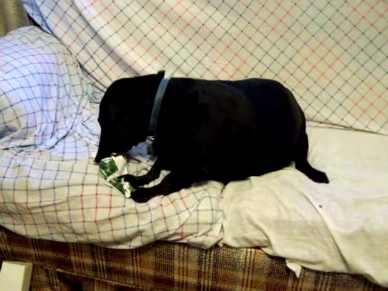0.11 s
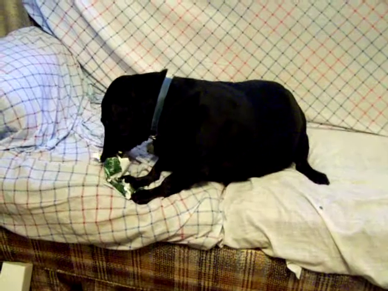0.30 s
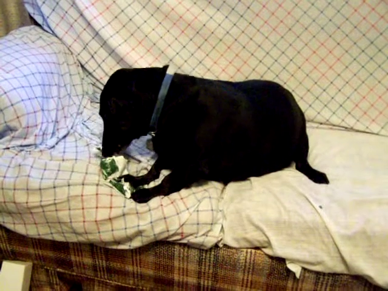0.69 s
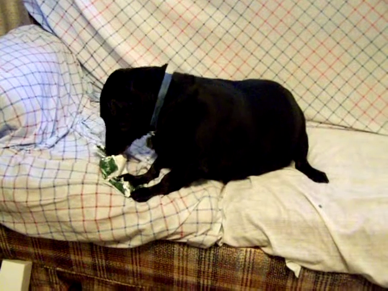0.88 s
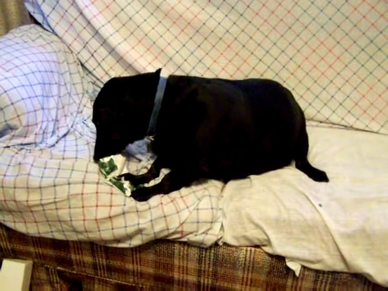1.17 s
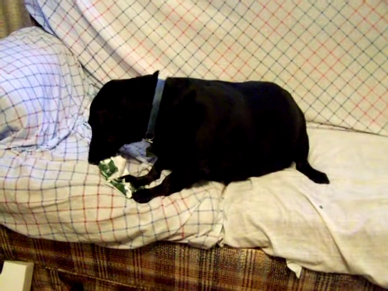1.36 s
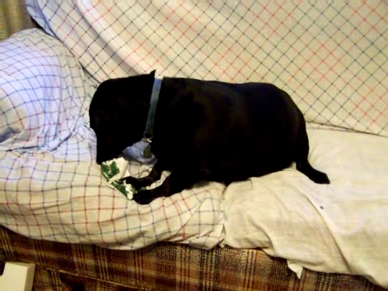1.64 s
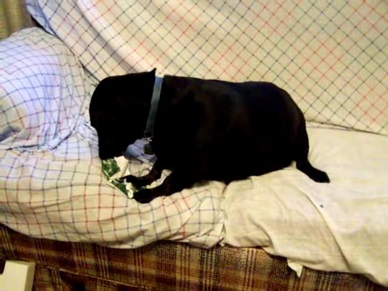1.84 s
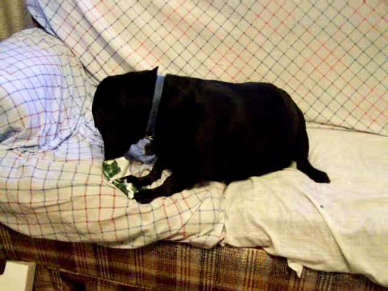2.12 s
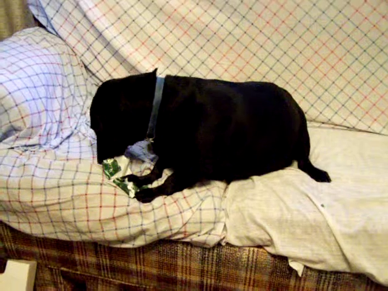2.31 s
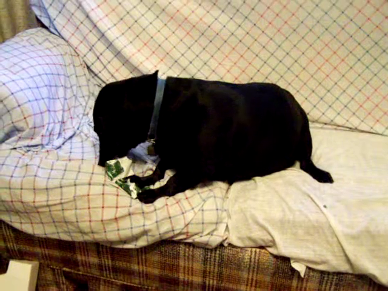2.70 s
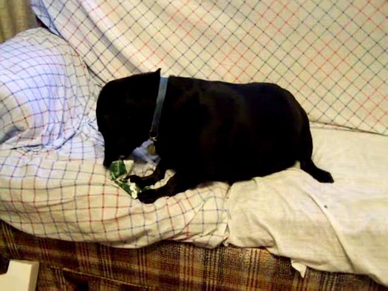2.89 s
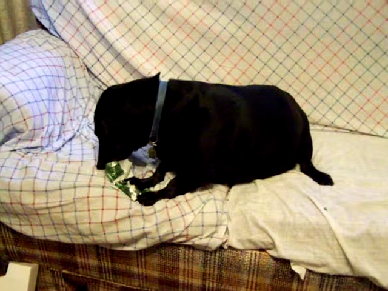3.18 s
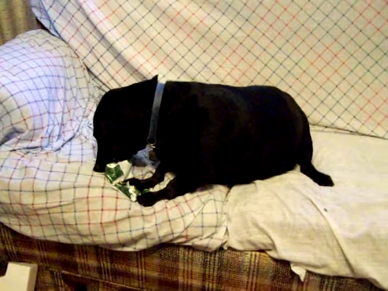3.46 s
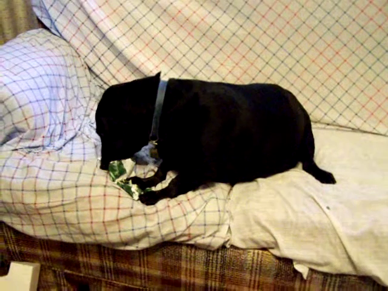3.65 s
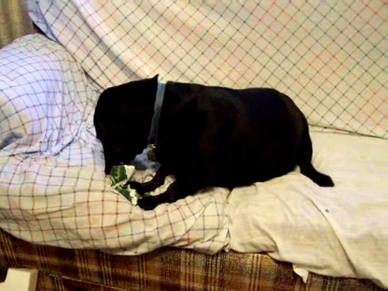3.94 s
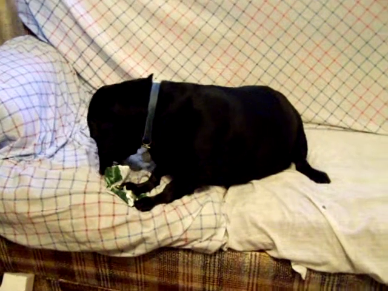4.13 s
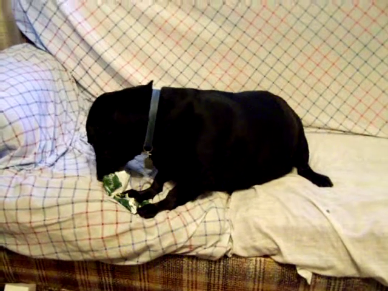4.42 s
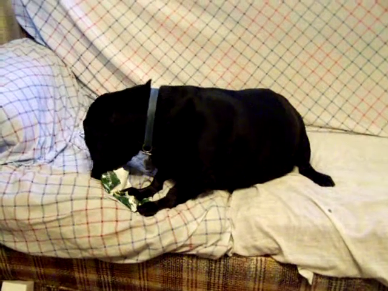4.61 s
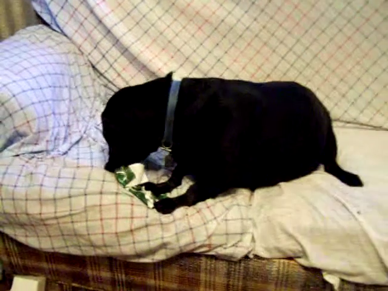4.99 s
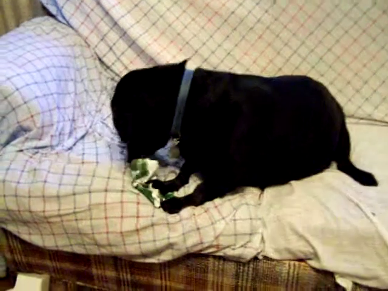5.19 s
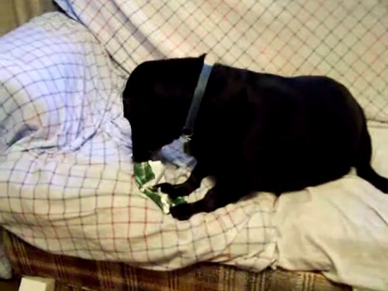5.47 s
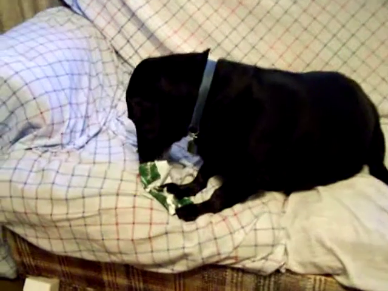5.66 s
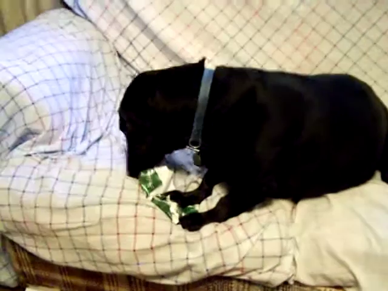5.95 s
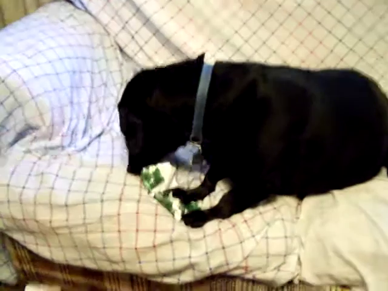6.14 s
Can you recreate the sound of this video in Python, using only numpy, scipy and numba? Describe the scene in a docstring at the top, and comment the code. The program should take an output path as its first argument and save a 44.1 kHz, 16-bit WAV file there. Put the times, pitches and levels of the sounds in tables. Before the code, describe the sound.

A dog chews and pulls at wrapping paper on a couch in a small, soft room, heard from a couple of metres. From 0 to 0.7 s, a lively burst of bright, sharp creases snaps amid fine crackles, with a short flap scrape around 0.64 s. It then drops to faint rustle; sparse, softer snaps come from 1.3 to 2.1 s, with faint rips at about 2.2 and 2.7 s. From 2.9 s the crinkling turns dense and crisp, in uneven clusters. After 4.4 s soft dull cushion thuds join in, and the strongest tearing and crackling comes around 5.1 to 5.4 s with a rasping scrape. It thins, then snaps and scrapes again near 5.9 s, easing off by 6.3 s. Short room echoes surround the paper; steady camera hiss, thin high motor tones and a faint low hum continue throughout.

```python
"""A dog on a couch chews and pulls at wrapping paper, a couple of metres from a small camera.
It opens with a burst of creases snapping over, each a few short ringing clicks, among swarms of fine crackles,
and one flap scrapes as noise in a resonance. Sparser, softer snaps and two faint rips follow; from 2.9 s on
the chewing turns dense, and after 4.4 s cushions thud as dull noise and more flaps scrape before it thins out.
A small soft room echoes the paper, over the camera's shaped hiss, thin motor tones and a faint hum throughout."""
import sys
import numpy as np
from scipy import signal
from scipy.fft import rfft, irfft
from scipy.io import wavfile
from scipy.ndimage import uniform_filter1d
from numba import njit

SR = 44100
rng = np.random.default_rng(int(sys.argv[2]) if len(sys.argv) > 2 else 0)


def ratio(d):
    """dB to gain"""
    e = np.asarray(d, float) / 20
    return 10 ** e


def bounce(signal):
    """Save signal as a 16-bit WAV file at the path given by the first command-line argument."""
    frames = np.transpose(np.atleast_2d(signal))
    limited = np.clip(frames, -1, 1)
    pcm = np.round(limited * 32767).astype(np.int16)
    wavfile.write(sys.argv[1], SR, pcm)


N = 278271  # samples, 6.31 s
SETTLE_S = 0.0088  # decay time of each swarm or scrape once its length is over


def colour(x, points):
    """Shape the spectrum by (Hz, dB) points, joined by straight lines over log frequency."""
    hz, db = np.transpose(points)
    axis = np.arange(len(x) // 2 + 1) * SR / len(x) + 1
    gain = ratio(np.interp(np.log(axis), np.log(hz), db))
    return irfft(rfft(x) * gain, len(x))


def level(x, db):
    """Set the rms level."""
    return x * ratio(db) / np.sqrt(np.mean(x ** 2))


def band(x, hz, width):
    """Two-pole resonance, width in Hz."""
    return signal.lfilter(*signal.iirpeak(hz, hz / width, fs=SR), x)


def walk(rate):
    """Random levels held 1 / rate s and slewed twice; spread near 1."""
    hold = int(SR / rate)
    steps = np.repeat(rng.standard_normal(N // hold + 1), hold)
    smooth = uniform_filter1d(uniform_filter1d(steps, hold), hold)
    return 1.456 * smooth[:N]


@njit
def grains(n, start, step, cycles, size, phase):
    """Short wave packets that swell for a moment and die; step is cycles per sample."""
    out = np.zeros(n)
    for g in range(len(start)):
        span = cycles[g] / step[g]  # samples until the packet is loudest
        for i in range(min(int(8 * span), n - start[g])):
            swell = i / span * np.exp(1 - i / span)
            out[start[g] + i] += size[g] * swell * np.sin(2 * np.pi * step[g] * i + phase[g])
    return out


def play(s, hz, cycles, db):
    """Grains at given times, pitches, swell lengths in cycles and envelope peak levels."""
    s, hz, cycles, db = np.broadcast_arrays(s, hz, cycles, db)
    start = np.clip(s * SR, 0, N - 1).astype(np.int64)
    return grains(N, start, hz / SR, 1. * cycles, ratio(db), rng.random(len(s)))


# Spectrum of the camera's hiss. Each row: frequency in Hz, relative density in dB per Hz.
HISS_SPECTRUM = [(15, -34), (25, -0.5), (174, -1), (390, -2.5), (1920, -12.5), (4010, -5.5), (5130, -12.5),
                 (6400, -8), (8180, -17), (8800, -47), (11400, -69.5), (19400, -120)]
# Narrow bands standing out of the hiss. Each row: centre in Hz, width in Hz, rms in dB before it wavers.
HISS_BANDS = [(4090, 590, -58), (6305, 560, -64)]
# Thin motor tones in the treble. Each row: centre frequency in Hz, rms in dB before it flickers.
MOTOR_TONES = [(3930, -65), (4037, -67.5), (4124, -66), (4323, -70), (6051, -70), (6142, -68.5),
               (6288, -66.5), (6352, -70), (6481, -70)]
# Harmonics of the motor hum. Each row: multiple of the base pitch, peak level in dB before it wavers.
HUM_LINES = [(1, -69.5), (2, -70.5), (3, -64), (4, -71), (6, -62), (8, -63)]


def camera():
    """Steady shaped noise with narrow resonant bands, thin drifting sines and wavering hum harmonics."""
    out = level(colour(rng.standard_normal(N), HISS_SPECTRUM), -52)
    for hz, width, db in HISS_BANDS:
        narrow = band(band(rng.standard_normal(N), hz, width), hz, width)
        out += level(narrow, db) * ratio(walk(6.2))
    for hz, db in MOTOR_TONES:
        flicker_db = 2 * walk(4.9)
        phase = 2 * np.pi * np.cumsum(hz + 3.0 * walk(9)) / SR
        out += np.sqrt(2) * ratio(db + flicker_db) * np.sin(phase)
    hum_hz = 29.2 * (1 + .004 * walk(2.065))
    turn = 2 * np.pi * np.cumsum(hum_hz) / SR
    for multiple, db in HUM_LINES:
        out += ratio(db + 1.5 * walk(8.5)) * np.sin(multiple * turn + 2 * np.pi * rng.random())
    return out


def room(x):
    """Close echoes from couch and walls, then a short tail that dulls as its brighter part fades first."""
    t60_s, echo_db, gap_s = 0.32, -8, 0.0016
    wall_s, wall_db = 0.011, 2.5  # the first hard wall answers this late; the dull tail is stronger from then on
    t = np.arange(SR // 3) / SR
    patches = ratio(1.5 * rng.standard_normal(len(t) // 40 + 1)).repeat(40)[:len(t)]
    noise = rng.standard_normal(len(t)) * patches
    dull = band(noise, 2600, 4800) * np.exp(-np.log(1000) * t / t60_s)
    bright = 2.7 * noise * np.exp(-np.log(1000) * t / (0.15 * t60_s))
    tail = (dull * ratio(wall_db * (t > wall_s)) + bright) * (t > gap_s)
    echo = signal.fftconvolve(x, tail / np.sqrt(np.sum(tail ** 2)))[:N]
    return x + ratio(echo_db) * echo


# Weight shifting on the cushions. Each row: start in seconds, noise rms in dB before the push shapes it,
# centre in Hz.
CUSHION_THUDS = [(4.461, -41.5, 431), (5.041, -39, 332), (5.123, -45, 223), (5.359, -35.5, 584),
                 (5.893, -42.5, 510), (6.096, -44, 191)]


def thuds():
    """Soft cushions: dull resonant noise with a fast onset and a 55 ms exponential decay."""
    out, t = np.zeros(N), np.arange(N) / SR
    for s, db, hz in CUSHION_THUDS:
        age = np.maximum(t - s, 0)
        push = np.minimum(age / 0.0015, 1) * np.exp(-age / 0.055)
        dull = level(band(rng.standard_normal(N), hz, 0.76 * hz), 0)
        out += ratio(db) * push * dull
    return out


# Paper sliding over paper, a dense coloured rasp. Each row: start in seconds, length in seconds before
# it settles, rms in dB before the push shapes it, centre in Hz.
FLAP_SCRAPES = [(0.636, 0.057, -46.5, 1680), (5.116, 0.038, -38, 2350), (5.944, 0.06, -41, 2270),
                (6.202, 0.05, -51, 2400)]


def scrapes():
    """Rough noise in one resonance while a flap slides."""
    out, t = np.zeros(N), np.arange(N) / SR
    for s, length, db, hz in FLAP_SCRAPES:
        fade = np.exp(-np.maximum(t - s - length, 0) / SETTLE_S)
        push = np.clip((t - s) / 0.005, 0, 1) * fade
        rough = rng.standard_normal(N) * ratio(4.7 * walk(400))
        rasp = band(band(rough, hz, 0.21 * hz), hz, 0.21 * hz)
        out += push * level(rasp, db)
    return out


# Parts of one crease's click. Each row: centre pitch in Hz, pitch scatter in dB of frequency ratio, usual
# cycles until loudest, usual level in dB relative to the crease, dB gained per octave of ring pitch.
CLICK_PARTS = [(1145, 2.5, 0.59, -22.5, -2.5), (2166, 3, 0.76, -14.5, 1.5), (3773, 0.91, 1.25, -7, 0),
               (5114, 1.61, 1.76, -14.5, 3), (6290, 1.58, 4, -18, 0.5)]


def creases(s, db, ring_hz):
    """Each crease flips with one wide click, and the flat facet beside it rings for a few cycles."""
    octaves = np.log2(ring_hz / 3500)  # small facets ring high and click brightly
    out = play(s, ring_hz, 1.39 * 2 ** (0.19 * octaves), db - 7.5 + 2.84 * octaves)
    for hz, scatter_db, cycles, share_db, lean_db in CLICK_PARTS:
        chance = rng.standard_normal((len(s), 4)).T
        pitch = np.clip(hz * ratio(scatter_db * chance[0]), 750, 9000)
        swell = cycles * ratio(2.4 * chance[1])
        part_db = db + share_db + lean_db * octaves + 1.9 * chance[2]
        # each part starts a fraction of a millisecond late, at random, which softens the click
        late = .00025 * np.abs(chance[3])
        out = out + play(s + late, pitch, swell, part_db)
    return out


# Rips and crumples, swarms of fine crackles. Each row: start in seconds, length in seconds before it
# settles, swarm level in dB that sets the crackle sizes.
RIP_SWARMS = [(0.004, 0.075, -43), (0.129, 0.075, -39.5), (0.26, 0.058, -31.5), (0.328, 0.025, -36.5),
              (0.406, 0.073, -33), (0.597, 0.017, -37), (0.64, 0.045, -38), (2.202, 0.16, -53.5),
              (2.698, 0.32, -47), (2.87, 0.015, -30.5), (3.302, 0.014, -31), (3.436, 0.04, -40.5),
              (3.483, 0.1, -34.5), (3.826, 0.025, -37), (4.001, 0.088, -41.5), (4.167, 0.073, -36),
              (4.263, 0.027, -35), (4.375, 0.019, -29.5), (4.533, 0.013, -40.5), (4.619, 0.0146, -36),
              (4.892, 0.028, -33), (4.938, 0.03, -40.5), (5.081, 0.059, -42), (5.177, 0.15, -44),
              (5.255, 0.044, -28), (5.363, 0.057, -25.5), (5.488, 0.039, -36), (5.93, 0.18, -42.5),
              (6.195, 0.12, -46.5)]


def crackle():
    """Fine random clicks swell while a rip runs and in a scatter answering each snap; a few are much bigger."""
    count = int(600 * N / SR)  # 600 crackles per second
    when, big = rng.random(count) * N / SR, rng.exponential(size=count)
    rustle_db = -56 + 4.0 * walk(30)  # faint rustle throughout
    power = ratio(rustle_db[(when * SR).astype(int)]) ** 2
    # a brief crackly scatter answers each snap about 5 ms later, like a rough wall echo
    answer_gap_s, answer_s, answer_db = 0.0049, 0.0066, -25
    answers = [(s + answer_gap_s, answer_s, db + answer_db) for s, db, _ in CREASE_SNAPS]
    for s, length, db in RIP_SWARMS + answers:
        after = np.maximum(when - s - length, 0)
        rise = np.clip((when - s) / 0.0032, 0, 1)
        power = power + rise * (ratio(db) * np.exp(-after / SETTLE_S)) ** 2
    size_db = 10 * np.log10(power) + 2.63 * big + 7  # a crackle peaks well above its swarm's level
    ring_hz = 3300 * ratio(3.1 * rng.standard_normal(count))
    return creases(when, size_db, np.clip(ring_hz, 1000, 8000))


# Big creases snapping over. Each row: start in seconds, strength in dB that the ring and click parts
# are set against, ring pitch in Hz.
CREASE_SNAPS = [(0.0592, -22, 6200), (0.0841, -10.5, 7040), (0.168, -11, 5800), (0.2616, -14, 4400),
                (0.2707, -5.5, 3470), (0.3348, -13, 935), (0.3463, -8, 4520), (0.471, -12.5, 4450),
                (0.6429, -20, 1800), (0.665, -18, 3520), (1.3058, -30, 1670), (1.3403, -22, 4170),
                (1.5065, -22.5, 1390), (1.5878, -15, 4400), (1.6547, -18, 4100), (1.745, -32.5, 5840),
                (1.8092, -28.5, 3020), (1.8234, -29, 2100), (1.8662, -37, 4780), (1.9054, -33, 3530),
                (2.045, -29.5, 6600), (2.5426, -20.5, 1090), (2.597, -21.5, 1020), (2.8764, -8.5, 4600),
                (2.9554, -15.5, 3300), (3.0362, -19.5, 3400), (3.1008, -17, 4000), (3.1362, -9.5, 3320),
                (3.226, -17.5, 5000), (3.277, -6.5, 3710), (3.306, -7, 3500), (3.3118, -9, 2700),
                (3.5008, -14.5, 2870), (3.5158, -14, 2860), (3.5573, -8, 3200), (3.567, -15, 3860),
                (3.6248, -18, 4340), (3.6877, -16, 3240), (3.7006, -11, 1265), (3.8252, -10, 4410),
                (4.0727, -12, 3200), (4.1226, -12.5, 2460), (4.1672, -14, 1830), (4.1949, -6, 5350),
                (4.2201, -9.5, 2900), (4.2674, -5, 3540), (4.2848, -8, 4150), (4.3831, -9, 3730),
                (4.5342, -16.5, 2050), (4.566, -12, 3150), (4.6306, -11, 3500), (4.7042, -19, 956),
                (4.7999, -24.5, 876), (4.899, -10.5, 3980), (4.974, -11, 2120), (5.0031, -15, 5800),
                (5.0458, -12, 955), (5.089, -8.5, 5000), (5.1584, -18, 1830), (5.1811, -14.5, 2250),
                (5.203, -9.5, 2380), (5.2256, -12, 1910), (5.2639, -14, 6630), (5.288, -7, 2090),
                (5.312, -14, 970), (5.3628, -10, 5500), (5.368, -4, 3970), (5.3826, -6.5, 2530),
                (5.4126, -9.5, 1920), (5.5146, -24, 7100), (5.552, -18.5, 2750), (5.5972, -15, 2070),
                (5.7291, -24, 4250), (5.791, -21, 3150), (5.8966, -8.5, 4570), (5.9395, -21, 2900),
                (6.015, -7.5, 2280), (6.0504, -13, 2160), (6.0888, -13, 4800), (6.1105, -18, 5140),
                (6.1566, -20.5, 2000), (6.2558, -27, 1700)]


def snaps():
    """The big creases: each fold flips over at its set time and rings its facet."""
    return creases(*np.transpose(CREASE_SNAPS))


def scene():
    """Paper in the room, cushions and camera noise."""
    paper = snaps() + crackle() + scrapes()
    return (room(paper) + thuds() + camera())[None]


def roll_off(x):
    """The treble ends steeply here."""
    return signal.sosfilt(signal.butter(12, 9100, fs=SR, output="sos"), x)


def record(dry):
    """The small recorder rolls off the treble, then cuts it steeply."""
    soft = signal.sosfilt(signal.butter(4, 6950, fs=SR, output="sos"), dry)
    cut = signal.sosfilt(signal.cheby2(12, 60, 9700, fs=SR, output="sos"), soft)
    return roll_off(cut)


dry = scene()
out = record(dry)
bounce(out)
```